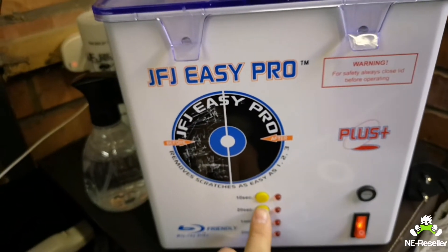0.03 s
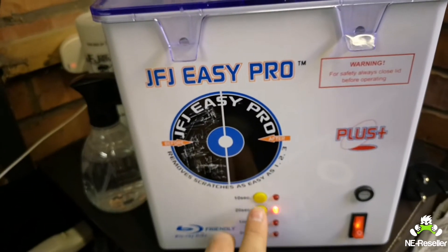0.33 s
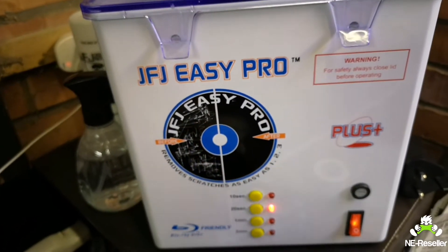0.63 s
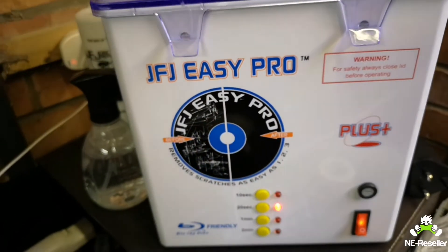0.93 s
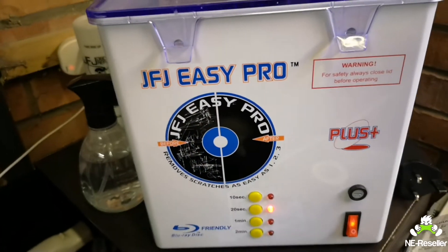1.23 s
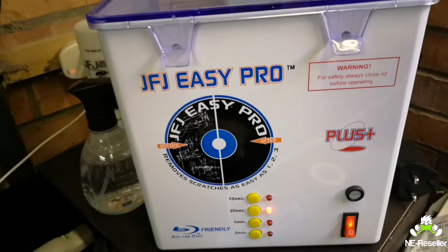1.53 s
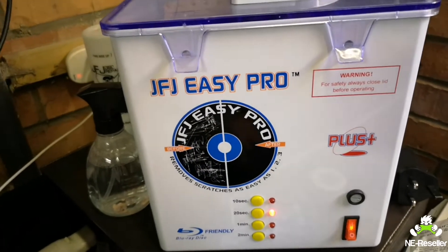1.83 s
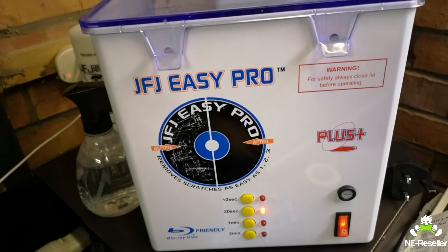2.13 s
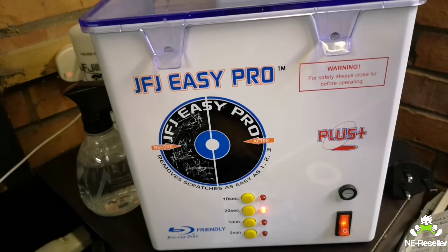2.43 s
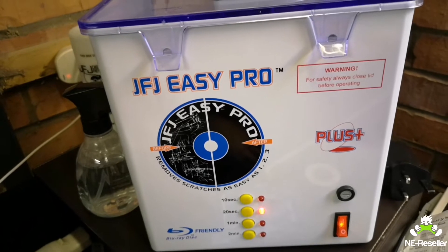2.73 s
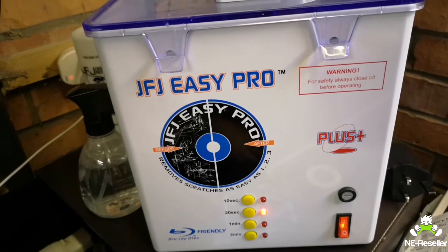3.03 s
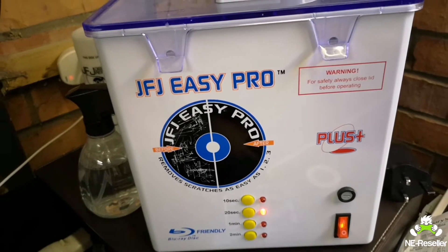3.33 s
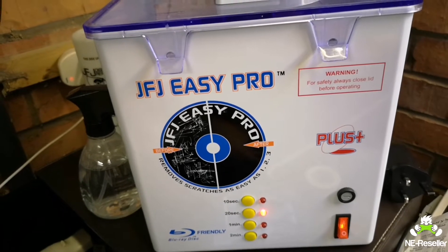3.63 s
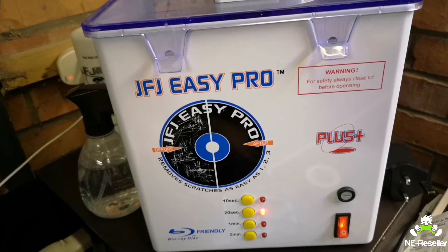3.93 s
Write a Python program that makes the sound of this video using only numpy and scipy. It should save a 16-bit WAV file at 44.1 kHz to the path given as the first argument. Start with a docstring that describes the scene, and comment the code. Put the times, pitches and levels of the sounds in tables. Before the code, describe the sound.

A small electric motor clicks on and runs with a steady whine, rattle and hiss.

```python
"""Disc polisher starting up

In a small room a button click fades, a relay snaps, and a mains-fed motor hums and spins up to about 40 turns a
second. It whines at 16 times the shaft speed and rattles its plastic case, while the pad hisses on the disc,
parts squeal and high overtones of the whine swell and fade. The listening point, hand-held and close by, moves."""
import sys
import numpy as np
from scipy import signal
from scipy.fft import rfft, irfft
from scipy.io import wavfile

SR = 44100
rng = np.random.default_rng(int(sys.argv[2]) if len(sys.argv) > 2 else 0)


def materialize(psi):
    """Save the field psi as 16-bit PCM at rate SR to the path in sys.argv[1].

    A 1-D psi becomes a single channel; in a 2-D psi each row is a channel.
    """
    bounded = np.clip(np.atleast_2d(psi).T, -1, 1)
    quanta = np.round(bounded * 32767).astype(np.int16)
    wavfile.write(sys.argv[1], SR, quanta)


N = 176400
T, FREQS = np.arange(N) / SR, np.fft.rfftfreq(N, 1 / SR)
START_S, MAINS_HZ = .212, 50.005
# Effect of the load: (time [s], rattle gain [dB], hiss gain [dB])
LOAD = [(.21, -2.5, 2), (.3, -0.5, 1.5), (.42, 2, 4), (.62, 1.5, 4), (.97, 1.5, 3.5), (1.2, -1, 1.5),
        (2.7, -1, 0.5), (4, -1, 0)]


def amp(db):
    """Amplitude ratio of a level in decibels."""
    return 10 ** (np.asarray(db) / 20)


def unit(x):
    """Normalisation to rms 1."""
    return x / np.sqrt(np.mean(x ** 2) + 1e-20)


def curve(table, column=1):
    """Linear interpolation of a time table at every sample."""
    rows = np.array(table)
    return np.interp(T, rows[:, 0], rows[:, column])


def read(table, hz, column=1):
    """Interpolation of a spectrum table in log frequency."""
    rows = np.array(table)
    return np.interp(np.log(hz + 1), np.log(rows[:, 0] + 1), rows[:, column])


def swell(at, half_width):
    """Gaussian envelope; the half-width is its standard deviation."""
    return np.exp(-.5 * ((T - at) / half_width) ** 2)


def running(rise_s, delay_s=0):
    """Linear onset ramp, starting delay_s after switch-on."""
    return np.clip((T - START_S - delay_s) / rise_s, 0, 1)


def drift(rate_hz):
    """Random fluctuation: low-pass Gaussian noise of rms 1."""
    return unit(irfft(rfft(rng.standard_normal(N)) * np.exp(-(FREQS / rate_hz) ** 2), N))


def noise_pair():
    """White noise at two nearby points, coherent at long wavelengths."""
    # Left-right likeness: (frequency [Hz], correlation [0..1])
    coherence = [(60, 1), (200, 0.91), (320, 0.55), (600, 0.09), (1300, 0.88), (2300, 0)]
    left, independent = rfft(rng.standard_normal((2, N)))
    shared = read(coherence, FREQS)
    right = shared * left + np.sqrt(1 - shared ** 2) * independent
    return irfft(np.array([left, right]), N)


def colour(x, db_at, size=8192):
    """Minimum-phase filter with the gain db_at(frequency)."""
    log_gain = np.log(amp(db_at(abs(np.fft.fftfreq(size, 1 / SR)))) + 1e-9)
    response = np.fft.ifft(np.exp(np.conj(signal.hilbert(log_gain)))).real
    return signal.fftconvolve(x, np.atleast_2d(response)[:, :size // 2], axes=1)[:, :N]


def shaped_noise(spectrum, tilt_db=0):
    """Filtered noise of rms 1, its spectrum tilted by tilt_db per octave."""
    return unit(colour(noise_pair(), lambda hz: read(spectrum, hz) + tilt_db * np.log2(hz + 1)))


def resonance(centre_hz, width_hz):
    """Random excitation of one resonance, rms 1."""
    return unit(irfft(rfft(noise_pair()) / (1 + (2 * (FREQS - centre_hz) / width_hz) ** 2), N))


def room_tone(level_db=-55):
    """Stationary ambient noise of a quiet room, strongest in the bass."""
    # Ambient spectrum: (frequency [Hz], relative level [dB])
    spectrum = [(20, -9), (83, -9.5), (181, -49), (1760, -42.5), (11200, -58)]
    return amp(level_db) * shaped_noise(spectrum)


def button(level_db=-49, decay_s=.028):
    """Reverberation: the start button's click decays exponentially in the room."""
    # Click spectrum: (frequency [Hz], relative level [dB])
    spectrum = [(59, -1), (100, -0.5), (2220, -17), (3090, -12.5), (14000, -46)]
    return amp(level_db) * np.exp(-T / decay_s) * shaped_noise(spectrum)


def relay(level_db=-22.5, rise_s=.0011, tail_db=-13, tail_s=.014):
    """Contact impacts: a dull tap, a bright snap and a bounce, each with a short damped tail."""
    # Impacts: (time [s], relative level [dB], decay time [s], tilt [dB/octave])
    impacts = [(.209, -5, .0045, -3.5), (.2143, -1.5, .0042, .8), (.2235, -11, .0025, -1)]
    # Impact spectrum before the tilt: (frequency [Hz], relative level [dB])
    spectrum = [(180, -37), (300, -17), (700, -12), (1750, -0.5), (3550, -5), (5180, -16), (6000, -10),
                (9490, -11), (15000, -35)]
    out = np.zeros((2, N))
    for at, db, decay_s, tilt_db in impacts:
        age = np.maximum(T - at, 0)
        decay = np.exp(-age / decay_s) + amp(tail_db) * np.exp(-age / tail_s)
        envelope = np.minimum(age / rise_s, 1) * decay
        out += amp(level_db + db) * envelope * shaped_noise(spectrum, tilt_db)
    return out


def hum(inrush_db=9.5):
    """Magnetic forces shake the windings at even mains harmonics, hardest during the current inrush."""
    # Steady hum: (multiple of the mains frequency, level [dB])
    harmonics = [(2, -41), (6, -52)]
    tones = sum(amp(db) * np.cos(2 * np.pi * (k * MAINS_HZ * T + rng.random())) for k, db in harmonics)
    inrush = amp(inrush_db * swell(at=.254, half_width=.059))
    return np.sqrt(2) * tones * running(rise_s=.04) * inrush


def shaft(turns, waver_db=2.6):
    """Forced vibration: unbalance gives shaft harmonics; the lower bearing tone beats with the hum."""
    # Unbalance tones: (multiple of the shaft speed, level [dB])
    harmonics = [(2, -47), (3, -49.5), (4, -54), (5, -42.5), (7, -46), (8, -53.5), (42, -56)]
    bearing_tones = [(2.578, -48), (11 / 3, -53.5)]
    out = np.zeros(N)
    for order, db in [*harmonics, *bearing_tones]:
        out += amp(db + waver_db * drift(2.8)) * np.cos(2 * np.pi * (order * turns + rng.random()))
    return np.sqrt(2) * out * running(rise_s=.32)


def rattle(turns, jitter_s=.0007, spread_db=3, decay_s=.0023, split_hz=750, top_hz=2200):
    """Impact excitation: uneven knocks shake the case, merging higher up into a throbbing whir."""
    # Knocks in each revolution: (shaft angle [turns], relative level [dB])
    knock_angles = [(0.103, -6.5), (0.418, 0.5), (0.661, -2.5)]
    # Response of the plastic case: (frequency [Hz], left gain [dB], right gain [dB])
    case = [(20, -71, -63), (55, -65, -75.5), (146, -66, -70), (176, -74, -67.5), (215, -66.5, -57),
            (265, -57.5, -72.5), (317, -69.5, -59.5), (421, -66.5, -72.5), (437.4, -68.5, -57.5),
            (480, -71, -72), (613, -68, -60), (617, -81.5, -66), (821, -84, -74.5), (853.6, -60.5, -62.5),
            (923, -71, -71.5), (1046, -75, -70), (1084, -76, -79.5), (1320, -76, -80.5), (1530, -74, -69),
            (1607, -65, -72.5), (1806, -81.5, -75), (2024, -81, -82), (2055, -67, -68), (2160, -94, -91)]

    def case_db(hz):
        """Case resonances with a steep treble roll-off."""
        roll_off = 60 * np.log2(np.maximum(hz / top_hz, 1))
        return np.array([read(case, hz, side) for side in (1, 2)]) - roll_off

    hits = np.zeros(N)
    for angle, db in knock_angles:
        crossings = np.flatnonzero(np.diff(np.floor(turns - angle)))
        lateness, strength = rng.standard_normal((256, 2))[:len(crossings)].T
        onsets = np.clip(crossings + (lateness * jitter_s * SR).astype(int), 0, N - 1)
        np.add.at(hits, onsets, amp(db + spread_db * strength))
    knocks = signal.lfilter([1], [1, -np.exp(-1 / (decay_s * SR))], hits)
    rub = amp(-9.5)
    whir = amp(-3) * (1 + .14 * np.cos(2 * np.pi * 2 * MAINS_HZ * T))
    noise = noise_pair()
    low = rfft(unit(noise * (knocks + rub)))
    high = rfft(unit(noise * (knocks + whir)))
    low_share = np.exp(-(FREQS / split_hz) ** 2)
    force = irfft(low * low_share + high * (1 - low_share), N) * np.sqrt(SR / 2)  # unit power per hertz
    return colour(force * amp(curve(LOAD)) * running(rise_s=.0065), case_db)


def pad_hiss(grain_db=2, low_hz=2450, split_hz=8200, top_follow=.52):
    """Friction noise of the pad on the disc; the top of the treble follows the load less."""
    # Friction spectrum: (frequency [Hz], left gain [dB], right gain [dB])
    pad = [(2140, -90, -86), (2600, -82.5, -82.5), (2900, -92, -85.5), (3070, -80, -78.5),
           (3320, -88.5, -99), (3840, -86.5, -79.5), (4120, -87, -84.5), (5050, -87.5, -89),
           (4970, -79.5, -82.5), (5950, -85, -83), (6150, -84.5, -88), (7270, -82, -83.5),
           (8100, -87, -85.5), (9950, -99, -80.5), (10340, -104.5, -83), (11860, -97, -89),
           (15000, -100, -92)]

    def pad_db(hz):
        """Friction spectrum with a roll-off below low_hz."""
        roll_off = 30 * np.log2(np.maximum(low_hz / (hz + 1), 1))
        return np.array([read(pad, hz, side) for side in (1, 2)]) - roll_off

    speck_db = 5.6 * swell(at=.605, half_width=.0034)  # grit catches under the pad
    roughness = amp(grain_db * np.minimum(drift(5000), 2) + speck_db)
    friction = unit(noise_pair() * roughness) * np.sqrt(SR / 2)
    hiss = colour(friction * running(rise_s=.0078), pad_db)
    top = signal.sosfiltfilt(signal.butter(8, split_hz, "high", fs=SR, output="sos"), hiss)
    load_db = curve(LOAD, column=2)
    return (hiss - top) * amp(load_db) + top * amp(top_follow * load_db)


def upper_whine(turns, wander_db=2, flutter_rad=.37):
    """Amplitude modulation: thin overtones fade in and out on each side as the listening point moves."""
    # Overtones: (multiple of the shaft speed, left level [dB], right level [dB])
    overtones = [(96, -63, -59), (112, -65, -61), (144, -66, -62), (192, -62, -65)]
    out = np.zeros((2, N))
    for order, *levels in overtones:
        phase = 2 * np.pi * order * turns + flutter_rad * drift(22)
        for side, db in enumerate(levels):
            fading = unit(amp(-wander_db * drift(.84)))
            out[side] += amp(db) * fading * np.cos(phase + 2 * np.pi * rng.random())
    return np.sqrt(2) * out * running(rise_s=.36)


def squeals(pitch_hz=2032, flutter_rad=.35):
    """Friction-induced vibration: a rubbing part squeals at one pitch."""
    # Squeals: (time [s], half-width [s], level [dB])
    events = [(.29, 0.023, -44.5), (1.345, 0.092, -46)]
    envelope = sum(amp(db) * swell(at, half_width) for at, half_width, db in events)
    tone = np.cos(2 * np.pi * pitch_hz * T + flutter_rad * drift(15))
    return np.sqrt(2) * envelope * tone * running(rise_s=.02)


def chirp(turns, order=47.5, level_db=-36, rasp_rad=.72):
    """Passage through resonance: a rising whine partial briefly excites the case during spin-up."""
    tone = np.cos(2 * np.pi * order * turns + rasp_rad * drift(110))
    return np.sqrt(2) * amp(level_db) * swell(at=.342, half_width=.022) * tone


def whine(turns, orders=(16, 32, 48, 128), flutter_rad=.12, right_lag_rad=.51):
    """Rotational harmonics: clean partials locked to the shaft, with slight phase modulation."""
    # Partials at the moving listening point: (time [s], then per order left level [dB], right level [dB])
    levels = [(0.34, -33, -41, -46, -56, -55, -66, -72, -72),
              (0.44, -36.5, -38, -49, -50.5, -48, -70, -71, -70),
              (0.85, -37, -50.5, -53, -46.5, -50.5, -71, -54, -61),
              (1.3, -46, -39, -56, -45, -57, -54, -74, -52.5),
              (2.35, -47, -38.5, -56, -45.5, -48.5, -62, -48.5, -58),
              (2.7, -45, -38.5, -44.5, -44, -61, -68, -61, -66),
              (3.9, -42.5, -37.5, -44.5, -44.5, -76, -58, -50.5, -79)]
    out = np.zeros((2, N))
    for i, order in enumerate(orders):
        phase = 2 * np.pi * (order * turns + rng.random()) + flutter_rad * (i + 1) * drift(20)
        for side in range(2):
            gain = amp(curve(levels, column=1 + 2 * i + side))
            out[side] += gain * np.cos(phase - right_lag_rad * side)
    return np.sqrt(2) * out * running(rise_s=.047, delay_s=.11)


def scrape(level_db=-32):
    """Friction transient: something catches against the case as the shaft gathers speed."""
    return amp(level_db) * swell(at=.348, half_width=.0065) * resonance(centre_hz=1020, width_hz=700)


def buzzes():
    """High overtones of the whine: narrow bands near high multiples of the shaft speed swell and fade."""
    # (time [s], half-width [s], frequency [Hz], bandwidth [Hz], level [dB], left minus right [dB])
    modes = [(.78, 0.28, 7730, 150, -54, 14), (.9, 0.36, 3856, 89, -55, 5),
             (2.252, 0.52, 5131, 50, -55, -7), (3.095, 1.1, 9532, 70, -59, -12),
             (3.5, 1.14, 10110, 90, -56.5, -12)]
    out = np.zeros((2, N))
    for at, half_width, hz, width_hz, db, pan_db in modes:
        gains = amp([[db + pan_db / 2], [db - pan_db / 2]])
        out += gains * swell(at, half_width) * resonance(hz, width_hz)
    return out * running(rise_s=.02)


def handling_rumble():
    """Structure-borne sound: the hand makes a brief low rumble at the listening point."""
    # Bumps: (time [s], half-width [s], level [dB])
    bumps = [(2.866, 0.1, -40)]
    envelope = sum(amp(db) * swell(at, half_width) for at, half_width, db in bumps)
    return envelope * resonance(centre_hz=37.9, width_hz=60)


def scene():
    """Superposition of all sources; one shaft angle times the rotational tones and the knocks."""
    # Spin-up and slight sag of the shaft: (time [s], speed [turns/s])
    speed = [(0.21, 21.97), (0.32, 34.32), (0.39, 37.58), (0.45, 38.82), (0.52, 39.83), (0.75, 40.14),
             (1.0, 39.98), (1.3, 40.08), (1.8, 39.83), (2.35, 40.01), (2.6, 39.73), (2.8, 39.64),
             (3.0, 39.57), (3.5, 39.51), (4.0, 39.4)]
    turns = np.cumsum(curve(speed)) / SR
    motor = shaft(turns) + whine(turns) + upper_whine(turns) + hum()
    machine = motor + rattle(turns) + pad_hiss() + buzzes() + scrape() + chirp(turns) + squeals()
    return machine + relay() + room_tone() + button() + handling_rumble()


def record(dry, cutoff_hz=15250):
    """Band limiting by a linear-phase low-pass filter."""
    low_pass = signal.firwin(511, cutoff_hz, window=("kaiser", 9), fs=SR)
    return signal.oaconvolve(dry, low_pass[None], "same")


dry = scene()
out = record(dry)
materialize(out)
```